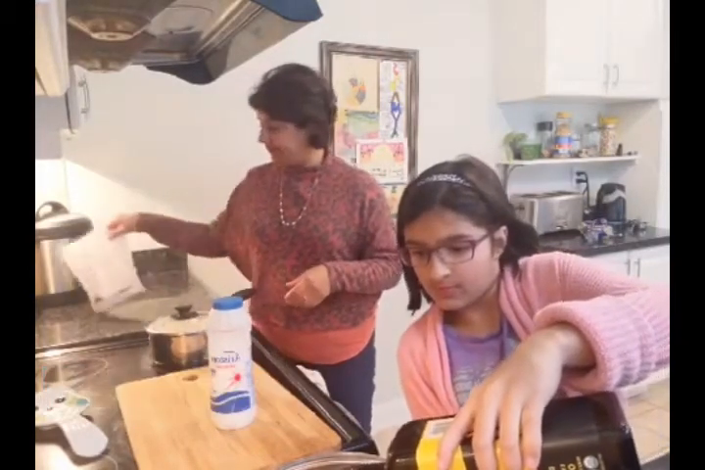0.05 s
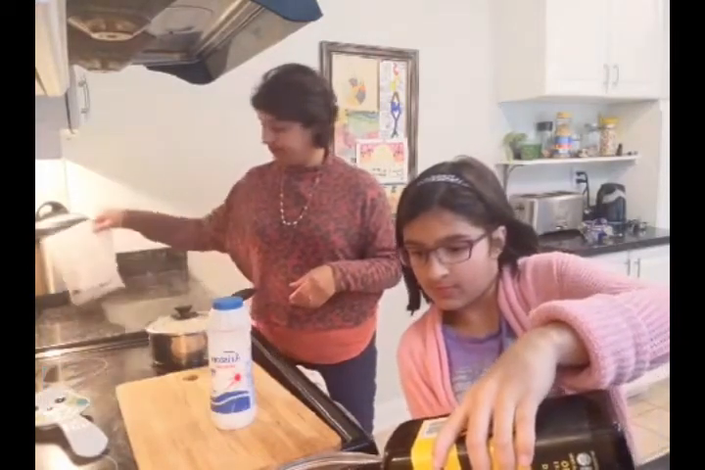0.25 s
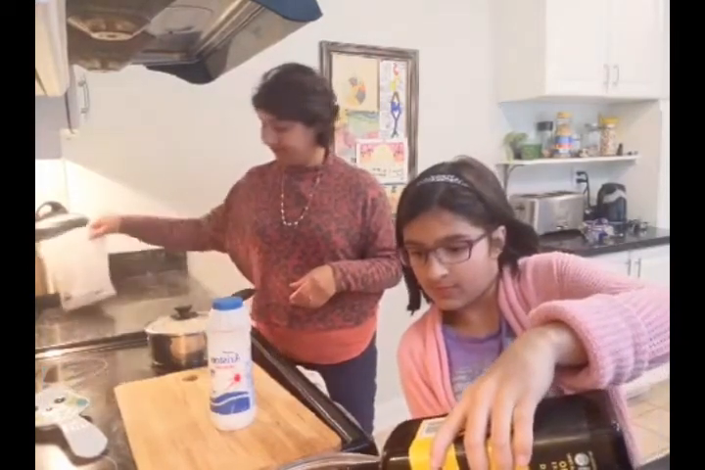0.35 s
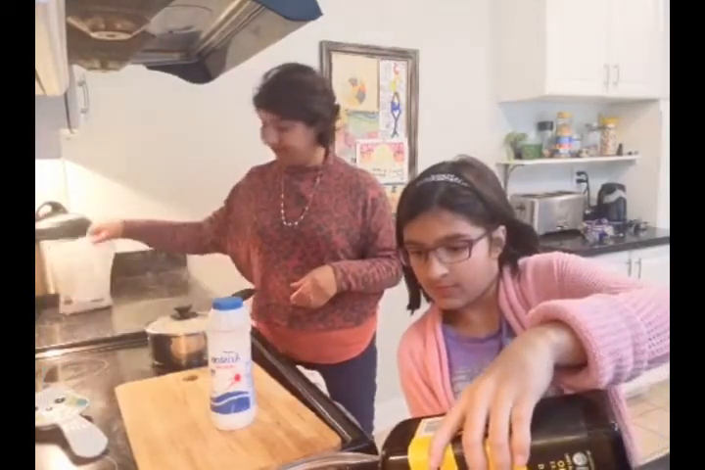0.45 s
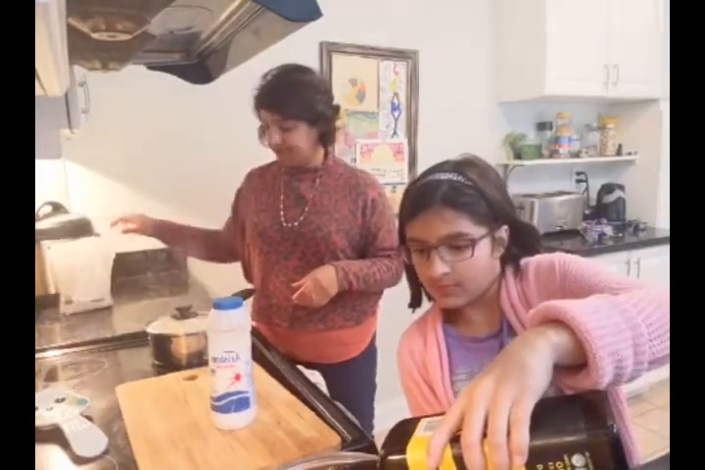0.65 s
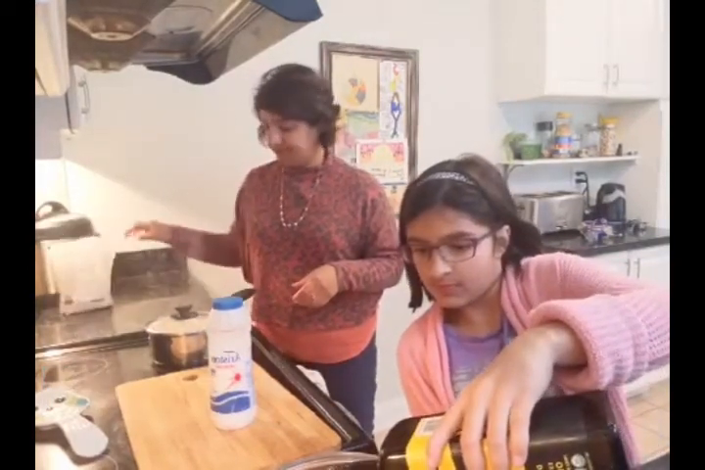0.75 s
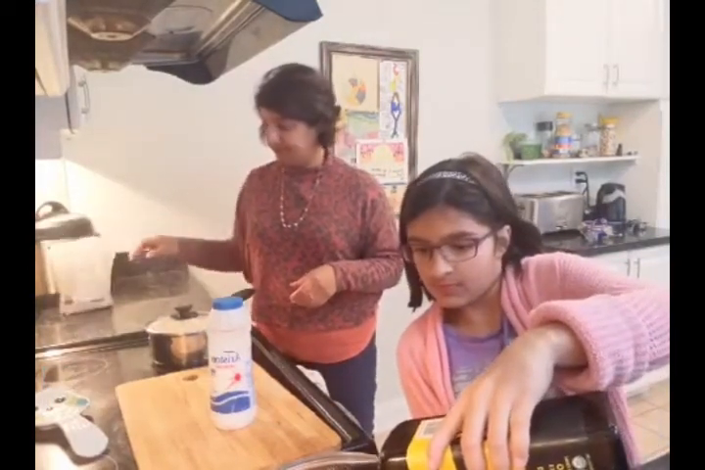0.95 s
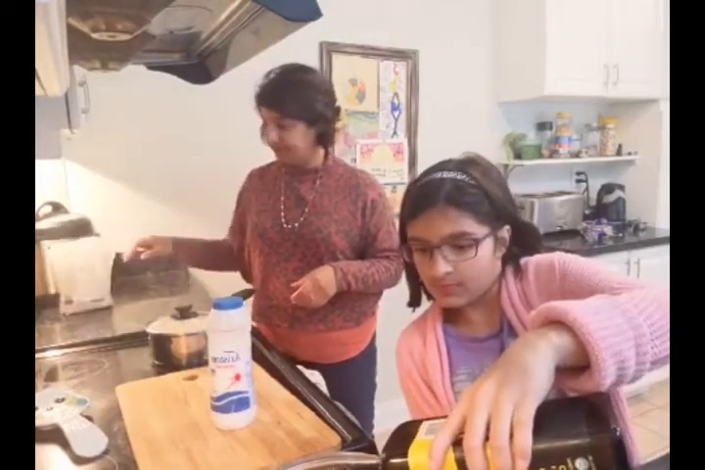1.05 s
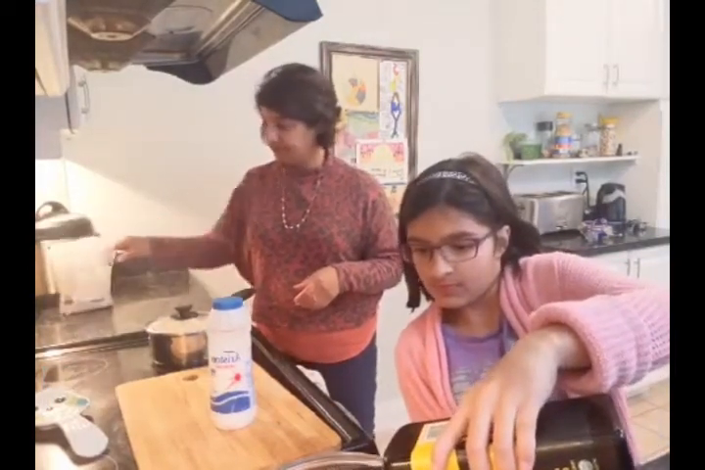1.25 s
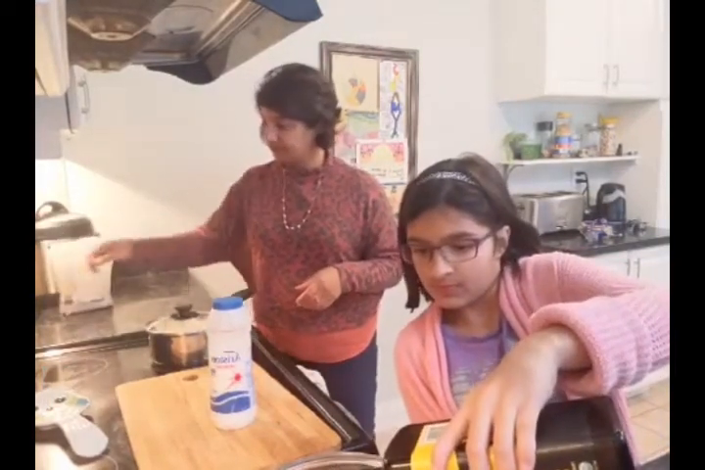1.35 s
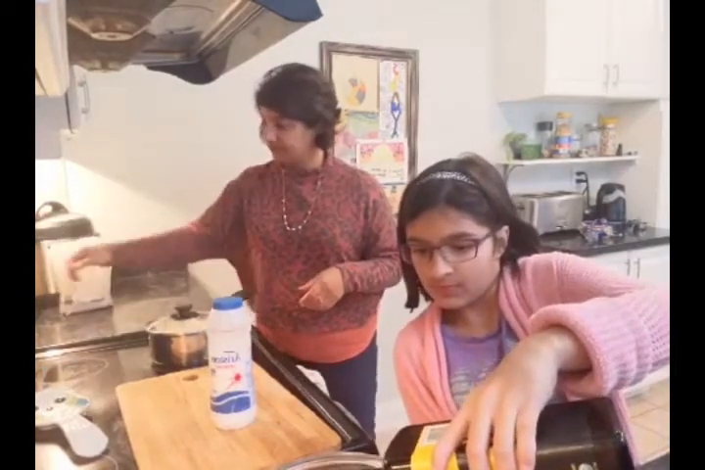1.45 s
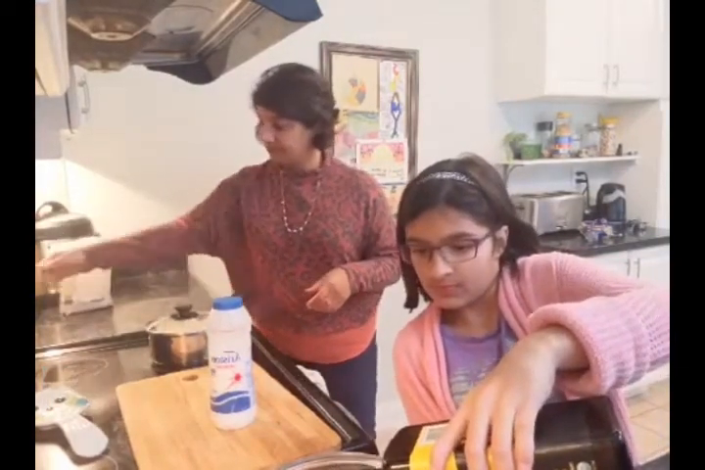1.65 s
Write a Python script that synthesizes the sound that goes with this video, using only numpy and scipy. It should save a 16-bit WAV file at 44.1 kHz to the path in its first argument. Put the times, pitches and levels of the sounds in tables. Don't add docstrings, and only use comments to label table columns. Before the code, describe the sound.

Popcorn bursts in a lidded pot: a sharp crack at the start with a quick paper bag crumple, one pop mid-way, then a louder cluster with metallic pings, close up in a small hard-walled kitchen.

```python
import sys
import numpy as np
from scipy import signal
from scipy.fft import rfft, irfft
from scipy.io import wavfile
from scipy.ndimage import uniform_filter1d

SR = 44100
rng = np.random.default_rng(int(sys.argv[2]) if len(sys.argv) > 2 else 0)


def generate_wav(sig):
    pcm = np.round(np.clip(np.atleast_2d(sig).T, -1, 1) * 32767).astype(np.int16)
    wavfile.write(sys.argv[1], SR, pcm)


def undo_db(level):
    steps = np.asarray(level, float) / 20
    return 10 ** steps


N = 74970


def evened(x):
    return x / np.sqrt(np.mean(x ** 2) + 1e-20)


def read(points, hz):
    f, value = np.transpose(points)
    return np.interp(np.log(hz + 1), np.log(f + 1), value)


def add(mix, start_s, sound):
    part = mix[round(start_s * SR):][:len(sound)]
    part += sound[:len(part)]


def tinted(x, shape):
    hz = np.fft.rfftfreq(len(x), 1 / SR)
    return evened(irfft(rfft(x) * undo_db(shape(hz)), len(x)))


def swell(t, rise_s, t60_s):
    fall_db = -60 * np.maximum(t - rise_s, 0) / abs(t60_s)
    return np.minimum(t / abs(rise_s), 1) * undo_db(fall_db)


def rings(t, modes, offsets_db, crest_s=None):
    hz, db, t60_s = np.transpose(modes)[:, :, None]
    phase = 0 if crest_s is None else np.pi / 2 - 2 * np.pi * hz * crest_s
    level = undo_db(db + offsets_db[:, None] - 60 * t / t60_s)
    return (level * np.sin(2 * np.pi * hz * t + phase)).sum(0)


def crinkle(count, per_s, spread_db):
    strength = undo_db(spread_db * np.minimum(rng.exponential(1, count), 2))
    snaps = strength * (rng.random(count) < per_s / SR)
    envelope = 0.53 + signal.lfilter([1], [1, -0.95], snaps)
    return rng.standard_normal(count) * envelope


def room_tone():
    # pitch_hz [Hz], level_db [dB per Hz]
    tone = [(15, -43), (25, -7), (122, -1.5), (147, -7.5), (339, -8), (421, -8.5), (508, -12.5),
            (13500, -31.5), (15400, -42)]
    return undo_db(-66) * tinted(rng.standard_normal(N), lambda hz: read(tone, hz))


def rattle(t, level_db, centre_hz, rise_s, t60_s):
    grains = crinkle(len(t), per_s=1900, spread_db=-3.0)
    body = tinted(grains, lambda hz: -14 * abs(np.log2((hz + 20) / centre_hz)))
    return undo_db(level_db) * swell(t, rise_s, t60_s) * body


def ping(t, pitch_hz, level_db, t60_s):
    waver = evened(uniform_filter1d(rng.standard_normal((2, len(t))), size=300, axis=1))
    unsteady = 1 + 0.09 * (waver[0] + 1j * waver[1])
    tone = (unsteady * np.exp(2j * np.pi * pitch_hz * t)).imag
    return undo_db(level_db) * swell(t, 0.0023, t60_s) * tone


def hull_crack(t, tilt_db):
    # pitch_hz [Hz], level_db [dB per Hz]
    crack_tint = [(700, -17.5), (1400, -7), (2500, -6), (5800, -1.5), (8500, -7.5), (10500, -20),
                  (13800, -17), (14500, -30)]

    def shape(hz):
        low_cut = -40 * (hz < 600)
        return read(crack_tint, hz) + tilt_db * np.log2((hz + 50) / 4000) + low_cut

    snap = swell(t, 0.0009, t60_s=0.028)
    steam = undo_db(-16.5) * swell(t, 0.006, t60_s=0.097)
    return tinted(rng.standard_normal(len(t)), shape) * (snap + steam)


def pot_thump(t):
    # pitch_hz [Hz], level_db [dB], t60_s [s]
    hollow = [(108, -13, 0.13), (127.6, -4.5, .15), (172.3, -1.5, 0.079), (224, -12.5, 0.052),
              (274.6, -6, 0.12), (348, -12, 0.22), (392.4, -10, 0.086), (478, -15, 0.11)]
    offsets_db = 0.96 * rng.standard_normal(len(hollow))
    return np.minimum(t / 0.0044, 1) * rings(t, hollow, offsets_db, crest_s=0.00678)


def metal_ring(t):
    # pitch_hz [Hz], level_db [dB], t60_s [s]
    metal = [(1288, -10.5, 0.19), (1605, -0.5, 0.1), (2390, -22, 0.24), (2564, 2, 0.074), (2860, -3, 0.15),
             (3010, -6, 0.2), (3330, -11, .08), (4670, -3, 0.1), (4970, -6.5, 0.3), (6040, -3, 0.057),
             (6190, -6, 0.15), (6855, -17, 0.071), (7630, -17, 0.048)]
    return rings(t, metal, 1.5 * rng.standard_normal(len(metal)))


def pop(t, crack_db, thump_db, ring_db, tilt_db):
    crack = undo_db(crack_db) * hull_crack(t, tilt_db)
    thump = undo_db(thump_db) * pot_thump(t)
    return crack + thump + undo_db(ring_db) * metal_ring(t)


def bag(t, level_db, rise_s, t60_s, tilt_db):
    # pitch_hz [Hz], level_db [dB per Hz]
    paper = [(60, -5), (240, -13), (460, -3.5), (560, -14.5), (1060, -5), (1500, -8), (3000, -5.5),
             (14500, -29)]

    def shape(hz):
        low_cut = -25 * (hz < 70)
        return read(paper, hz) + tilt_db * np.log2((hz + 400) / 2000) + low_cut

    grains = crinkle(len(t), per_s=2200, spread_db=0.5)
    return undo_db(level_db) * swell(t, rise_s, t60_s) * tinted(grains, shape)


def counter_boom(t):
    return undo_db(-48.5) * swell(t, 0.024, t60_s=0.57) * np.sin(2 * np.pi * 59.6 * t)


def kitchen_tail():
    # pitch_hz [Hz], t60_s [s]
    decay = [(100, 0.19), (260, 0.27), (700, 0.41), (1840, 0.36), (4850, 0.33), (12800, 0.18)]
    taps = np.zeros(SR // 2)
    at = np.arange(260, len(taps) - 20, 20)
    taps[at + rng.integers(0, 20, len(at))] = rng.choice([-1., 1.], len(at))
    hz, t, z = signal.stft(taps, SR, nperseg=256)
    dying = z * undo_db(-60 * t / read(decay, hz)[:, None])
    tail = signal.istft(dying, SR, nperseg=256)[1]
    return (tail / np.linalg.norm(tail))[:SR // 2]


def scene():
    # start_s [s], level_db [dB], centre_hz [Hz], rise_s [s], t60_s [s]
    rattles = [(.001, -60, 1300, 0.0013, 0.12), (.015, -64, 493, 0.0075, 0.11),
               (.042, -56.5, 1830, 0.0016, 0.048), (.48, -59.5, 56.7, 0.017, 0.18),
               (.685, -66, 61, 0.026, 0.12), (.345, -49, 5100, 0.01, 0.092),
               (.484, -61.5, 3720, .003, 0.14), (.646, -56.5, 4300, 0.0014, 0.22),
               (.665, -61, 5300, 0.0015, 0.041), (.674, -50.5, 2310, 0.0042, 0.18),
               (.38, -63, 990, 0.01, 0.45), (.248, -44.5, 1010, .01, 0.18), (.38, -61, 55.3, 0.022, 0.39),
               (.73, -58.5, 337, 0.0064, 0.1), (.755, -54, 2780, 0.0035, 0.11),
               (1.32, -49, 4630, 0.0028, 0.16), (1.321, -50, 1420, .005, 0.079),
               (1.41, -49, 2780, 0.0014, 0.11), (1.568, -64.5, 2700, 0.0037, 0.12),
               (1.57, -66, 780, 0.0033, 0.065)]
    # start_s [s], pitch_hz [Hz], level_db [dB], t60_s
    # [s]
    pings = [(0.044, 878, -54.5, 0.05), (0.26, 1066, -62, 0.25), (.262, 900, -44, .25),
             (0.332, 2617, -55, 0.42), (.676, 788, -51, 0.11), (.68, 2615, -63, 0.66),
             (1.228, 2570, -76, 0.086), (1.269, 4330, -39, 0.031), (1.275, 2390, -44, 0.052),
             (1.322, 802, -54, 0.068), (1.324, 5024, -52.5, 0.48), (1.324, 2390, -51.5, 0.2),
             (1.325, 4015, -57.5, 0.45), (1.399, 2820, -37.5, 0.047), (1.403, 4065, -47, 0.27),
             (1.406, 2576, -53.5, 0.18), (1.415, 6300, -59, 0.15), (1.414, 6855, -51.5, 0.092),
             (1.417, 348, -48, 0.36), (1.42, 394, -55.5, 0.49), (.0425, 2350, -50.5, 0.013),
             (1.396, 237, -27, 0.034), (.328, 255, -44, 0.024)]
    # start_s [s], crack_db [dB], thump_db [dB], ring_db [dB], tilt_db of crack [dB per octave]
    pops = [
        (.205, -35.5, -39.5, -48, 2),
        (.292, -45.5, -69, -62, 10),
        (.327, -43, -41, -52.5, 5),
        (.6545, -40, -40.5, -54.5, 5),
        (1.2216, -37.5, -43, -53, -1.5),
        (1.269, -39, -38.5, -49.5, -3),
        (1.3915, -35.5, -31.5, -49.5, 2.5),
    ]
    # start_s [s], level_db [dB], rise_s [s], t60_s [s], tilt_db [dB per octave]
    pushes = [
        (0.218, -31.5, 0.005, 0.05, .5),
        (.228, -36.5, 0.0067, 0.074, 1.3),
        (.237, -30.5, 0.0075, 0.037, 2),
        (.244, -33.5, 0.0024, 0.04, -0.5),
        (.256, -36, 0.0013, 0.069, -5),
        (0.265, -43, 0.0032, 0.093, -16),
        (.28, -54.5, 0.0032, 0.58, -4),
    ]
    t = np.arange(SR // 3) / SR
    near = np.zeros((2, N))
    for k, (start_s, *row) in enumerate(rattles):
        add(near[k % 2], start_s, rattle(t, *row))
    for k, (start_s, *row) in enumerate(pops):
        add(near[k % 2], start_s, pop(t, *row))
    for start_s, *row in pushes:
        add(near[1], start_s, bag(t, *row))
    add(near[0], 0.22, counter_boom(t))
    room = sum(signal.fftconvolve(part, kitchen_tail())[:N] for part in near)
    for start_s, *row in pings:
        add(near[0], start_s, ping(t, *row))
    return (near.sum(0) + undo_db(-5.5) * room + room_tone())[None]


def roll_off(x):
    return signal.sosfilt(signal.butter(12, 15600, fs=SR, output="sos"), x)


def record(dry):
    edge_hz, edge_db = 14350, -28
    hz = np.fft.rfftfreq(N, 1 / SR)
    shelf = undo_db(edge_db * np.clip((hz - edge_hz) / 200 + 0.5, 0, 1))
    return roll_off(irfft(rfft(dry) * shelf, N))


dry = scene()
out = record(dry)
generate_wav(out)
```